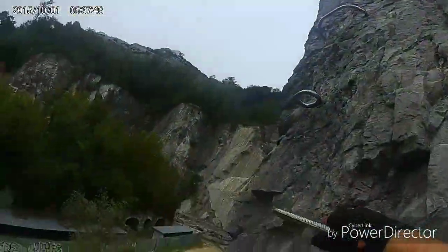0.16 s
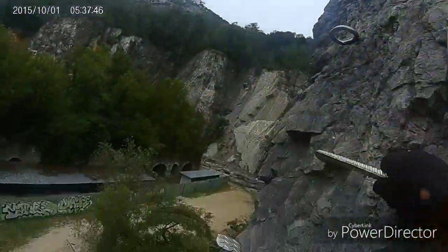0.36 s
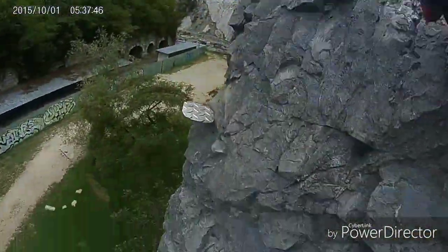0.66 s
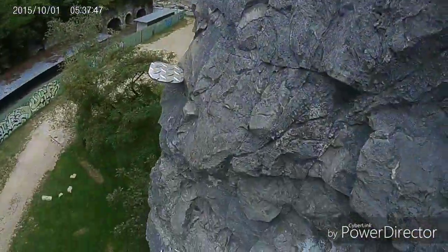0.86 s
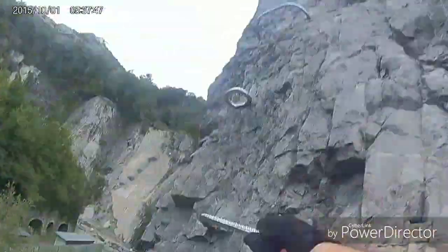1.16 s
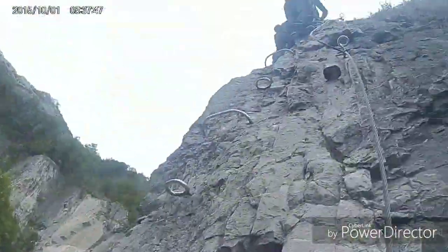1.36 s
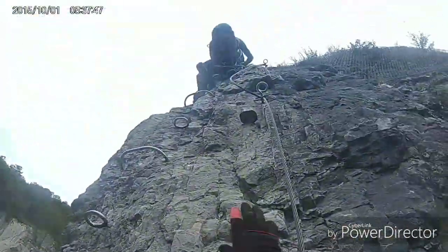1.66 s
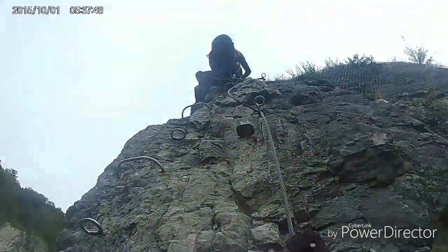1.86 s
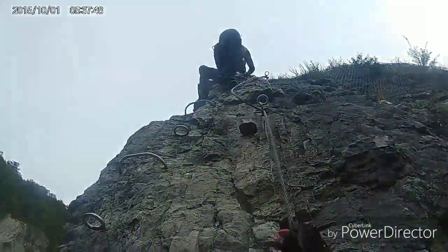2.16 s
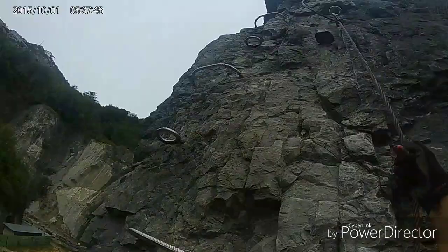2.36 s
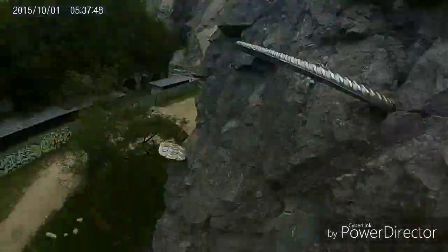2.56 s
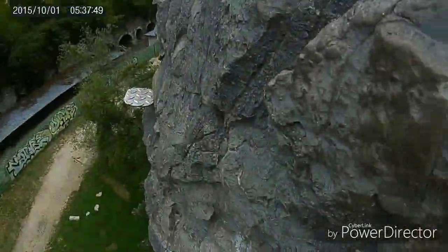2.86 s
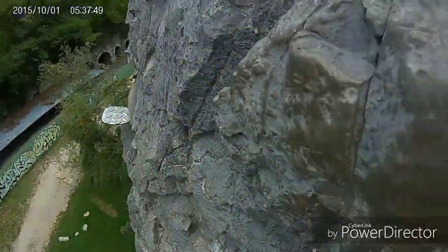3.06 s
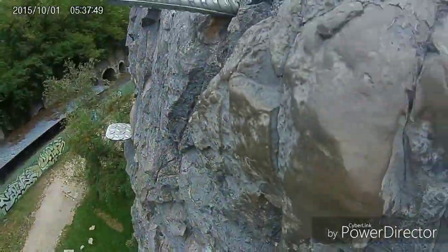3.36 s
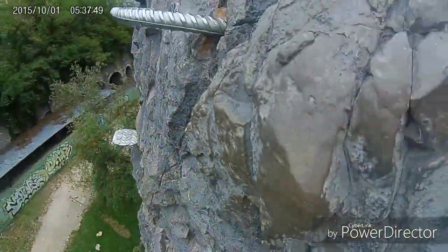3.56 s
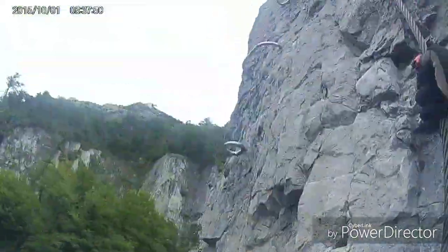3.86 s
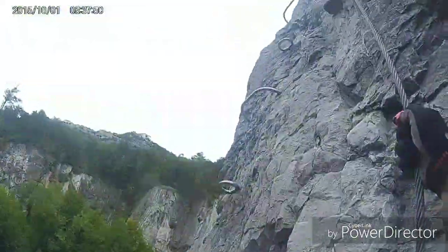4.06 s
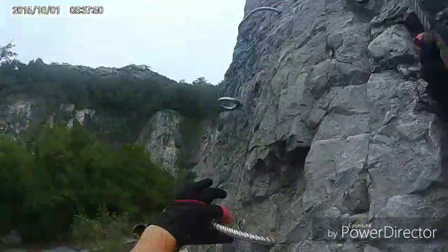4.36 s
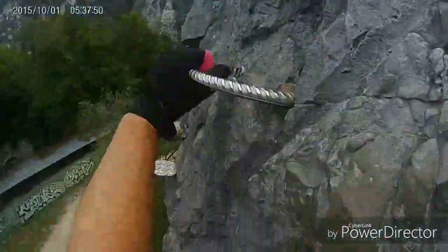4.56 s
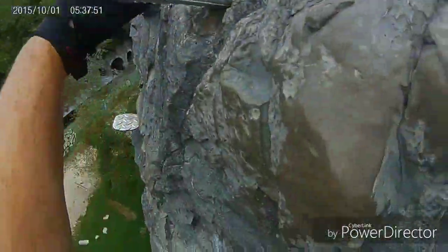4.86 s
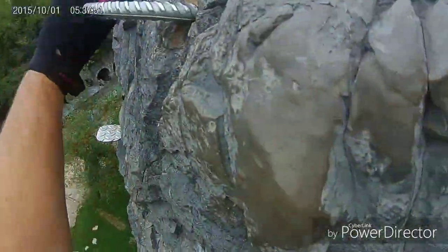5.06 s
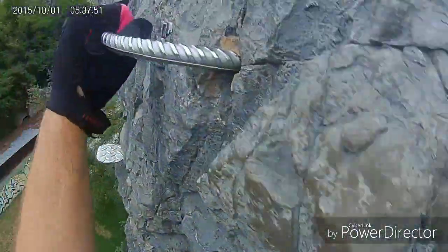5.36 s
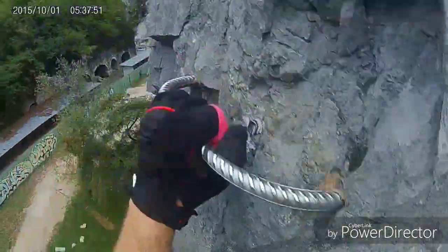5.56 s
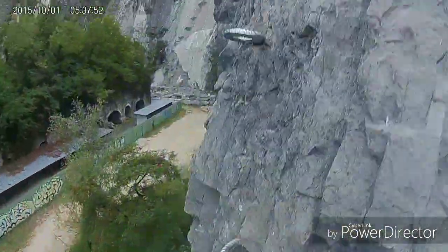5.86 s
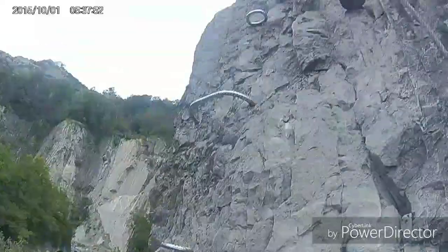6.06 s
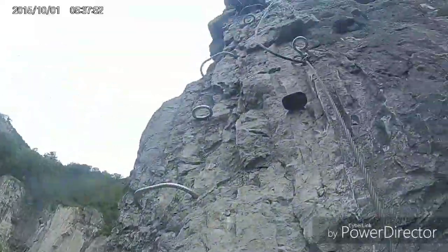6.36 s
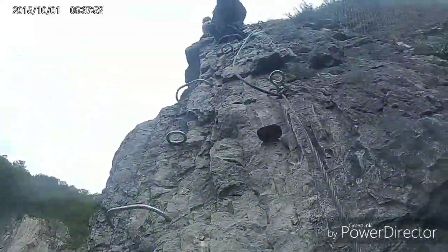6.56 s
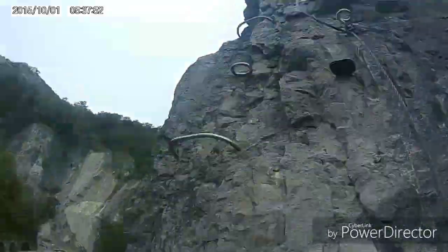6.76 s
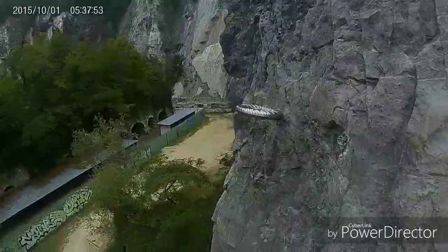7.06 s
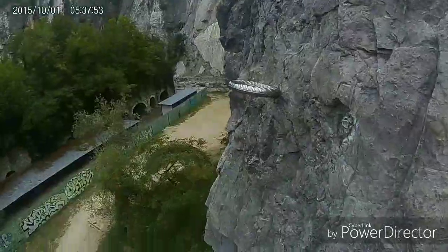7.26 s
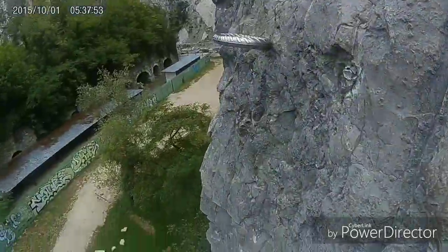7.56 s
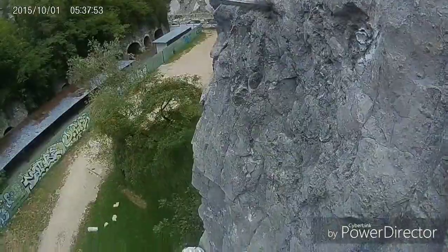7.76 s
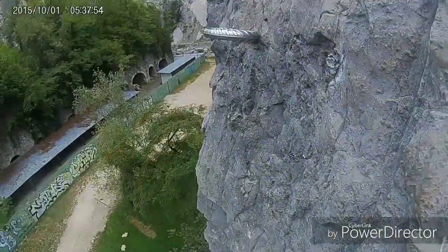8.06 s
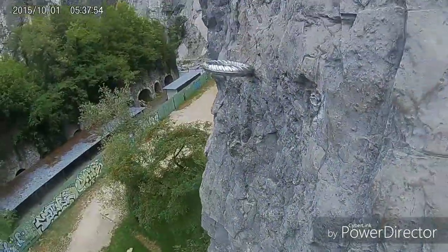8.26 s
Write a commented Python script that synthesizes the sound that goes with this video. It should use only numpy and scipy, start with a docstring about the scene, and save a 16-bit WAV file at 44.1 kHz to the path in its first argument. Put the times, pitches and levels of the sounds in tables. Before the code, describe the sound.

Karabiners clack unevenly against a steel cable and slide along it in short rasps as a climber moves up a cliff. The metal sounds close, dry and dulled by the closed housing of a body-worn microphone. Straps tug and brush that housing, its plastic mount snaps a few times, and several sharp knocks stand out above everything else. Quiet valley air, light hiss and very faint crickets lie underneath.

```python
"""Climbing on a steel cable

A climber moves up iron rungs on a cliff, wearing a microphone in a closed housing. Karabiners clack
and slide on the cable, heard through the dull resonances of the housing. With each move the housing
is bumped, snaps in its mount and is tugged and brushed by straps.
Quiet valley air, microphone hiss and faint bush crickets lie underneath."""
import sys
import numpy as np
from scipy import signal
from scipy.fft import rfft, irfft, next_fast_len
from scipy.io import wavfile

SR = 44100
rng = np.random.default_rng(int(sys.argv[2]) if len(sys.argv) > 2 else 0)


def waveform_to_disk(signal):
    """Save audio, clipped to [-1, 1], as 16-bit WAV at the path in sys.argv[1]."""
    frames = np.transpose(np.atleast_2d(signal))
    scaled = np.clip(frames, -1, 1) * 32767
    samples = np.round(scaled).astype(np.int16)
    wavfile.write(sys.argv[1], SR, samples)


N = 371763
TIME_S = np.arange(N) / SR
HIT_TIME_S = np.arange(SR // 8) / SR


def from_db(db):
    """Decibels to gain."""
    return 10 ** (np.asarray(db) / 20)


def unit_rms(x):
    """Scale to rms 1."""
    return x / np.sqrt(np.mean(x ** 2) + 1e-30)


def unit_peak(x):
    """Scale to peak 1."""
    return x / np.max(np.abs(x))


def add(out, time_s, sound):
    """Mix a short sound in at time_s."""
    at = round(time_s * SR)
    out[at:at + len(sound)] += sound[:N - at]


def butter(x, hz, kind, order=2):
    """Butterworth low- or high-pass."""
    sos = signal.butter(order, np.clip(hz, 5, .45 * SR), kind, fs=SR, output="sos")
    return signal.sosfilt(sos, x + 1e-18)


def resonate(x, hz, width_hz):
    """Two-pole resonance, peak gain 1."""
    r = np.exp(-np.pi * width_hz / SR)
    feedback = [1, -2 * r * np.cos(2 * np.pi * hz / SR), r * r]
    return signal.lfilter(np.array([1, 0, -1]) * (1 - r * r) / 2, feedback, x)


def coloured_noise(samples, spectrum):
    """Noise at rms 1 from spectrum rows (frequency [Hz], density [dB])."""
    hz, db = np.transpose(spectrum)
    size = next_fast_len(samples)
    bins_hz = np.maximum(np.fft.rfftfreq(size, 1 / SR), 1)
    gain = from_db(np.interp(np.log(bins_hz), np.log(hz), db))
    return unit_rms(irfft(rfft(rng.standard_normal(samples), size) * gain, size)[:samples])


def stick_slip(per_s, spread_db):
    """Random clicks of uneven size."""
    clicks = (rng.random(N) < per_s / SR) * rng.choice([-1, 1], N)
    return clicks * from_db(spread_db * np.minimum(rng.exponential(1, N), 3))


def swells(rows):
    """Envelope of Gaussian bells from rows (time [s], half length [s], level [dB])."""
    power = np.zeros(N)
    for time_s, half_s, db in rows:
        near = slice(max(0, int((time_s - 4 * half_s) * SR)), int((time_s + 4 * half_s) * SR))
        power[near] += from_db(2 * db) * np.exp(-2 * ((TIME_S[near] - time_s) / half_s) ** 2)
    return np.sqrt(power)


# valley air (frequency [Hz], relative density [dB])
AIR_SPECTRUM = [(12, -16), (30, 4), (80, -2), (200, 0.5), (330, -1), (600, -2.5), (1250, -4.5), (2000, -9),
                (3200, -13), (5000, -20), (6500, -27), (8500, -39.5), (12000, -68)]
# hollow of the housing (frequency [Hz], width [Hz], level [dB])
HOLLOW_MODE = (1400, 35, -82)
# microphone hiss (frequency [Hz], relative density [dB])
HISS_SPECTRUM = [(5000, -28.5), (8000, -8.5), (10000, -4.5), (12000, 0), (14000, 6.5), (15500, 6)]


def air(valley_db=-62.5, hiss_db=-80.5):
    """Steady outdoor air, a faint hollow tone from the housing and microphone hiss."""
    hz, width_hz, hollow_db = HOLLOW_MODE
    valley = from_db(valley_db) * coloured_noise(N, AIR_SPECTRUM)
    hollow = from_db(hollow_db) * unit_rms(resonate(rng.standard_normal(N), hz, width_hz))
    hiss = from_db(hiss_db) * coloured_noise(N, HISS_SPECTRUM)
    return valley + hollow + hiss


# bouts of chirping (start [s], end [s])
CRICKET_BOUTS = [(1.89, 2.7), (6.77, 8.2)]


def crickets(wing_hz=11450, width_hz=900, period_s=.32, jitter_s=.03, half_s=.026, level_db=-89):
    """Each chirp is a short buzz of the wing's resonance, repeated loosely through a bout."""
    buzz = resonate(resonate(rng.standard_normal(N), wing_hz, width_hz), wing_hz, 2 * width_hz)
    times_s = np.concatenate([np.arange(start_s, end_s, period_s) for start_s, end_s in CRICKET_BOUTS])
    chirps = [(time_s + rng.normal(0, jitter_s), half_s, level_db) for time_s in times_s]
    return unit_rms(buzz) * swells(chirps)


# resonances of gear and housing (frequency [Hz], width [Hz], gain [dB])
GEAR_MODES = [(96, 53, -13), (202.5, 28.8, -2.5), (348, 104, -14.5), (500, 250, -13), (1088, 168, -11.5),
              (1285, 63, -7), (1661, 210, 0.5), (1840, 198, -2), (2290, 192, -3.5), (3400, 300, -8),
              (4170, 280, -6), (4800, 490, -30)]
MAIN_MODE = 6
# bands of a strike: thud, ring bottom, ring top, upper ring, edge (frequency [Hz])
STRIKE_BANDS_HZ = [500, 1000, 1900, 2400, 3200]


def strike(pitch_hz, band_db, chatter_s=.0045, energy_s=.016):
    """A contact chatters into the modes; where it lands sets pitch and balance."""
    force = .14 * rng.standard_normal(len(HIT_TIME_S)) * np.exp(-(HIT_TIME_S / chatter_s) ** 2)
    force[0] += 2
    out = 0
    for k, (hz, width_hz, mode_db) in enumerate(GEAR_MODES):
        gain = from_db(mode_db + np.interp(hz, STRIKE_BANDS_HZ, band_db))
        if abs(k - MAIN_MODE) <= 1:  # load shifts the main mode and its neighbours
            hz = hz * pitch_hz / GEAR_MODES[MAIN_MODE][0]
        ring = resonate(force, hz, width_hz)
        through_wall = resonate(ring, hz, 5.2 * width_hz)
        out = out + (-1) ** k * gain * unit_rms(through_wall)
    return butter(out * np.sqrt(energy_s / HIT_TIME_S[-1]), 5500, "low", order=4)


def clack(pitch_hz, ring_db, thud_db, bright_db):
    """Metal hits metal: harder contact gives more upper ring and edge."""
    edge_db = ring_db - 15.5 + .4 * bright_db
    return strike(pitch_hz, [thud_db, ring_db, ring_db, ring_db + bright_db, edge_db])


def jostle(per_s=2, pitch_hz=1560, ring_db=-70, thud_db=-61, spread_db=2):
    """Loose gear touches faintly at uneven intervals."""
    out = np.zeros(N)
    for k in range(int(per_s * N / SR)):
        time_s = (k + rng.random()) / per_s
        levels_db = rng.normal([ring_db, thud_db], spread_db)
        add(out, time_s, clack(pitch_hz, *levels_db, bright_db=-12))
    return out


def strokes(rows, attack_s=.015, swell_db=4.5, release_s=.012):
    """Envelope swelling with the pull, from rows (start [s], length [s], end level [dB])."""
    power = np.zeros(N)
    t = TIME_S[:SR]
    for start_s, length_s, end_db in rows:
        gate = np.minimum(t / attack_s, 1) * np.exp(-np.maximum(t - length_s, 0) / release_s)
        pull = from_db(end_db + swell_db * (np.minimum(t / length_s, 1) - 1))
        add(power, start_s, (gate * pull) ** 2)
    return np.sqrt(power)


def grip(rate_hz, depth_db):
    """Randomly wavering pressure of a sliding contact, rms 1."""
    waver = unit_rms(butter(rng.standard_normal(N), rate_hz, "low"))
    return unit_rms(from_db(depth_db * np.clip(waver, -2, 2)))


# sliding gear and lanyards (start [s], length [s], rasp [dB], shudder [dB])
SLIDE_STROKES = [(0.23, 0.11, -67, -58.5), (0.606, 0.65, -72, -62), (1.39, 0.33, -58.5, -58),
                 (1.659, 0.09, -49.5, -51), (2.729, 0.05, -48.5, -53.5), (2.818, 0.32, -62, -58),
                 (4.076, 0.077, -41.5, -47.5), (4.169, 0.12, -59.5, -55), (4.756, 0.25, -63, -54.5),
                 (5.093, 0.12, -69, -50.5), (5.485, 0.025, -78, -50), (6.018, 0.16, -60, -50),
                 (6.34, 0.18, -57, -53.5), (7.154, 0.053, -62, -56), (7.351, 0.19, -64, -58)]


def slides(rest_rasp_db=-73, tilt_db_per_octave=-13):
    """Sliding metal feeds soft, dense slips into the modes: the middle ones rasp, the low ones shudder."""
    slips = stick_slip(per_s=3500, spread_db=2.5) * grip(rate_hz=14, depth_db=2.5)
    body = 0
    for k, (hz, width_hz, mode_db) in enumerate(GEAR_MODES):
        gain = from_db(mode_db + tilt_db_per_octave * np.log2(max(hz / 1100, 1)))
        body = body + (-1) ** k * gain * unit_rms(resonate(slips, hz, width_hz))
    rasp = unit_rms(butter(butter(body, 1000, "high", order=4), 4800, "low", order=4))
    shudder = unit_rms(butter(butter(body, 215, "high", order=4), 470, "low", order=4))
    rows = np.array(SLIDE_STROKES)
    rasp_gain = strokes(rows[:, [0, 1, 2]]) + from_db(rest_rasp_db)
    shudder_gain = strokes(rows[:, [0, 1, 3]]) * grip(rate_hz=22, depth_db=3.5)
    return rasp * rasp_gain + shudder * shudder_gain


# karabiner on cable (time [s], pitch [Hz], ring [dB], thud [dB], brightness re ring [dB])
CABLE_CLACKS = [(0.08, 1640, -54, -48.5, -20), (0.1853, 1480, -69, -54, -15),
                (0.537, 1400, -58.5, -59, -10), (0.7188, 1580, -60.5, -61, -10),
                (0.7812, 1540, -57, -50, -11), (1.0037, 1410, -58, -75, -12), (1.303, 1630, -75, -55, -10),
                (1.363, 1620, -56, -63, -9), (1.4623, 1540, -55, -55, -6),
                (1.7416, 1600, -41.5, -45.5, -11.5), (2.015, 1600, -52.5, -56.5, -3),
                (2.2365, 1596, -34, -39.5, -15.5), (2.36, 1640, -58.5, -71, -3),
                (2.8084, 1650, -47.5, -47.5, -15), (2.8722, 1620, -55, -69, -10),
                (3.6969, 1610, -43.5, -46.5, -5.5), (3.7686, 1620, -52.5, -45.5, -22),
                (4.0876, 1690, -45.5, -49, -2), (4.1672, 1700, -55, -46, -25),
                (4.4413, 1705, -45.5, -50.5, -8), (4.7183, 1575, -42.5, -46.5, -17),
                (4.8453, 1520, -50, -49.5, -21), (5.172, 1520, -52.5, -42, -28),
                (5.3537, 1560, -62.5, -48, -20), (5.481, 1590, -56, -48, -19),
                (5.903, 1560, -46.5, -41, -10), (5.912, 1680, -41.5, -45, 1), (5.98, 1620, -54, -46, -19),
                (6.1734, 1640, -51, -43, -8), (6.3885, 1640, -46.5, -44.5, -9),
                (6.438, 1640, -51, -48.5, -11), (6.7079, 1680, -53.5, -66, -2.5),
                (6.8934, 1620, -52.5, -63, -15), (7.2298, 1620, -45.5, -48, -11),
                (8.1198, 1470, -45, -46, -24), (8.209, 1640, -44, -59, 0.5)]
# karabiner gate (time [s], strike level [dB])
GATE_TICKS = [(2.712, -65), (4.0883, -44.5), (4.1895, -65), (4.794, -60), (7.082, -65.5), (7.742, -63)]


def karabiners(spring_hz=4250, spring_width_hz=1100, spring_gain_db=2):
    """Karabiners clack on the cable; their gates tick with the ping of a small spring."""
    out = np.zeros(N)
    for time_s, pitch_hz, ring_db, thud_db, bright_db in CABLE_CLACKS:
        add(out, time_s, clack(pitch_hz, ring_db, thud_db, bright_db))
    for time_s, db in GATE_TICKS:
        tick = strike(GEAR_MODES[MAIN_MODE][0], band_db=db + np.array([-8, -8, -8, -4, 0]))
        add(out, time_s, from_db(spring_gain_db) * resonate(tick, spring_hz, spring_width_hz))
    return out


# friction on plastic (frequency [Hz], relative density [dB])
PLASTIC_SPECTRUM = [(150, -8), (550, 13), (850, 13.5), (1200, -2), (2100, 6.5), (3800, 0.5), (5200, -5),
                    (6500, -22), (9000, -32), (11500, -35), (12500, -65)]


def brushes(rows):
    """Rubbing on the plastic, from rows (time [s], half length [s], level [dB])."""
    return swells(rows) * butter(coloured_noise(N, PLASTIC_SPECTRUM), 7500, "low")


# mount snapping over (time [s], level [dB])
MOUNT_SNAPS = [(1.151, -25), (3.046, -24), (4.9697, -25), (5.9125, -42)]


def mount(rise_s=.0009, decay_s=.0014, energy_s=.00062, creak_lead_s=.005, creak_gain_db=-27):
    """The plastic mount creaks under load, then gives with a dry snap."""
    out = brushes([(time_s - creak_lead_s, .0089, db + creak_gain_db) for time_s, db in MOUNT_SNAPS])
    envelope = (1 - np.exp(-HIT_TIME_S / rise_s)) * np.exp(-HIT_TIME_S / decay_s)
    for time_s, db in MOUNT_SNAPS:
        snap = unit_rms(envelope * coloured_noise(len(HIT_TIME_S), PLASTIC_SPECTRUM))
        add(out, time_s, from_db(db) * snap * np.sqrt(energy_s / HIT_TIME_S[-1]))
    return out


def scuffs(rows):
    """Gritty webbing heard through the housing, from rows (time [s], half length [s], level [dB])."""
    hollow = resonate(stick_slip(per_s=900, spread_db=3.5), hz=420, width_hz=400)
    return swells(rows) * unit_rms(butter(hollow, 850, "low", order=4))


def bump(level_db, release_ms, hardness_hz, leak=.046, rattle_s=.0039, wall_hz=3000):
    """A bump squeezes the air in the housing: a leaking pressure step, a hollow pop, a gritty rattle."""
    release_s = release_ms / 1000
    push = butter(np.exp(-HIT_TIME_S / release_s), leak / release_s, "high")
    pop = from_db(-3) * resonate(push, hz=350, width_hz=340)
    shake = rng.standard_normal(len(HIT_TIME_S)) * HIT_TIME_S * np.exp(-2 * HIT_TIME_S / rattle_s)
    rattle = from_db(-20) * unit_peak(resonate(shake, hz=600, width_hz=400))
    pressure = butter(butter(push + pop + rattle, hardness_hz, "low"), wall_hz, "low")
    grind = min(release_s * hardness_hz / 2, 1) ** 2  # greatest for long, hard contacts
    grit = from_db(-24) * grind * unit_peak(butter(shake, wall_hz, "low", order=3))
    return from_db(level_db) * butter(unit_peak(pressure) + grit, 6000, "low", order=3)


def sway(time_s, level_db, half_s, hz=36):
    """The housing swings on its straps: a cycle or two of air pressure."""
    return swells([(time_s, half_s, level_db)]) * np.sin(2 * np.pi * hz * (TIME_S - time_s))


# straps pulling on the housing (time [s], level [dB], release [ms], hardness [Hz], sway [dB])
STRAP_TUGS = [(0.576, -40.5, 0.56, 300, -49), (0.791, -41, 2.3, 490, -56), (0.863, -42, 2.3, 280, -49),
              (1.055, -43.5, 2.1, 300, -62), (1.153, -23.5, 2.5, 563, -33), (3.049, -23, 3.0, 450, -30.5),
              (3.154, -28.5, 1.9, 795, -45), (4.972, -24, 2.3, 520, -32), (5.53, -39, 3.4, 300, -41),
              (5.884, -24.5, 3.6, 280, -29), (6.696, -41, 1.3, 258, -67), (7.4513, -32, 2.3, 1100, -49)]


def tugs(take_up_lead_s=.03, touch_lead_s=.00747, settle_lag_s=.022):
    """A strap takes up slack, touches and pulls tight; the housing rubs, sways and settles."""
    out = brushes([(time_s, .031, db - 42) for time_s, db, *_ in STRAP_TUGS])
    out += scuffs([(time_s - .008, .018, db - 28) for time_s, db, *_ in STRAP_TUGS])
    for time_s, db, release_ms, hardness_hz, sway_db in STRAP_TUGS:
        add(out, time_s - take_up_lead_s, bump(db - 13.5, release_ms=4, hardness_hz=230))
        add(out, time_s - touch_lead_s, bump(db - 6.5, release_ms=1.7, hardness_hz=hardness_hz))
        add(out, time_s, -bump(db, release_ms, hardness_hz))  # the pull drops the pressure
        out -= sway(time_s, sway_db, half_s=.0094)
        out -= sway(time_s + settle_lag_s, sway_db - 14, half_s=.022)
    return out


# knocks on the housing (time [s], level [dB], release [ms], hardness [Hz], graze [dB],
# clatter [dB], rebound delay [s], strap brush [dB], sway [dB])
HOUSING_KNOCKS = [(1.617, -9.5, 0.4, 1070, -32, -42, 0.031, -48.5, -48),
                  (4.2181, -7.5, 0.38, 1700, -44, -46, .024, -46.5, -35.5),
                  (5.5622, -20, 2.5, 720, -60, -33.5, 0.016, -72, -51),
                  (5.932, -20, 2, 756, -34, -38, .021, -77, -39),
                  (6.475, -15.5, 0.55, 1680, -44, -41, .029, -48.5, -43.5),
                  (7.4706, -30, 0.45, 1200, -33, -37, .034, -51.5, -41)]


def knocks(graze_lead_s=.011, clatter_lag_s=.0081, clatter_half_s=.0051, sway_lag_s=.008):
    """The housing is grazed, then hit; it clatters in its mount, rebounds against a strap and sways."""
    out = brushes([(time_s + rebound_s, .0093, brush_db)
                   for time_s, *_, rebound_s, brush_db, _ in HOUSING_KNOCKS])
    burst = np.exp(-((HIT_TIME_S - clatter_lag_s) / clatter_half_s) ** 2)
    for knock in HOUSING_KNOCKS:
        time_s, db, release_ms, hardness_hz, graze_db, clatter_db, rebound_s, _, sway_db = knock
        ring = resonate(burst * rng.standard_normal(len(HIT_TIME_S)), hz=1080, width_hz=650)
        clatter = from_db(clatter_db) * unit_peak(butter(ring, 1700, "low", order=4))
        add(out, time_s - graze_lead_s, bump(graze_db, release_ms=1.8, hardness_hz=1200))
        add(out, time_s, bump(db, release_ms, hardness_hz) + clatter)
        out += sway(time_s + rebound_s + sway_lag_s, sway_db, half_s=.019)
    return out


def scene():
    """Mono mix, close and dry on the open rock face."""
    background = air() + crickets()
    gear = jostle() + slides() + karabiners()
    housing = mount() + tugs() + knocks()
    return (background + gear + housing)[None]


def record(dry, cutoff_hz=15600):
    """Steep elliptic low-pass."""
    return signal.sosfilt(signal.ellip(10, .2, 70, cutoff_hz, fs=SR, output="sos"), dry)


dry = scene()
out = record(dry)
waveform_to_disk(out)
```